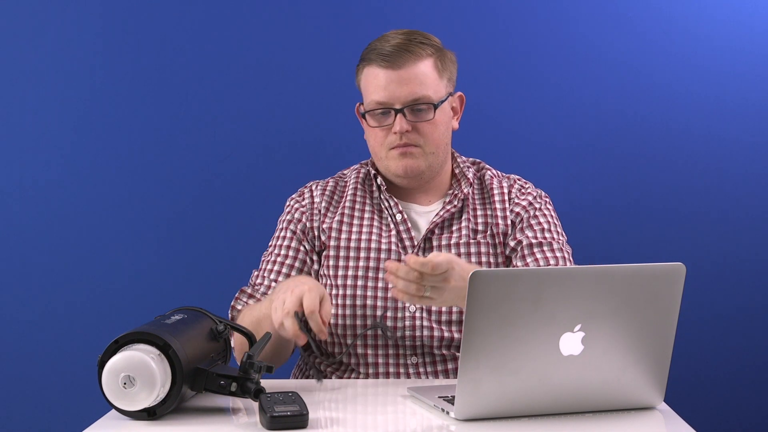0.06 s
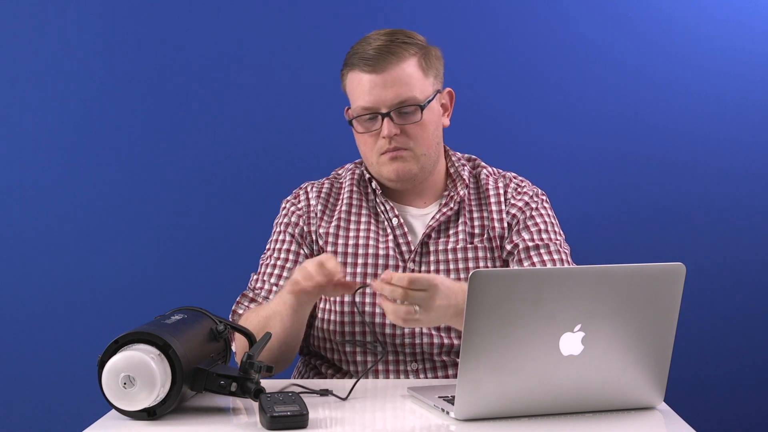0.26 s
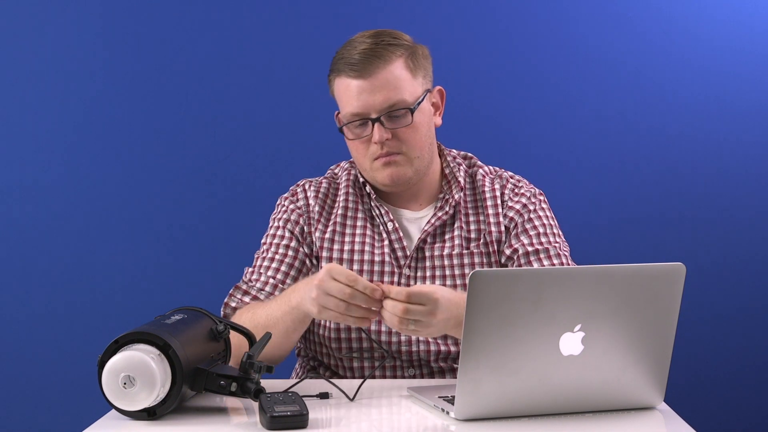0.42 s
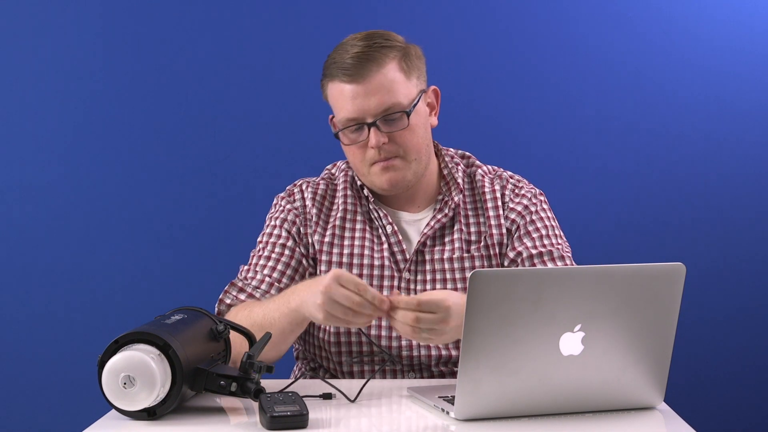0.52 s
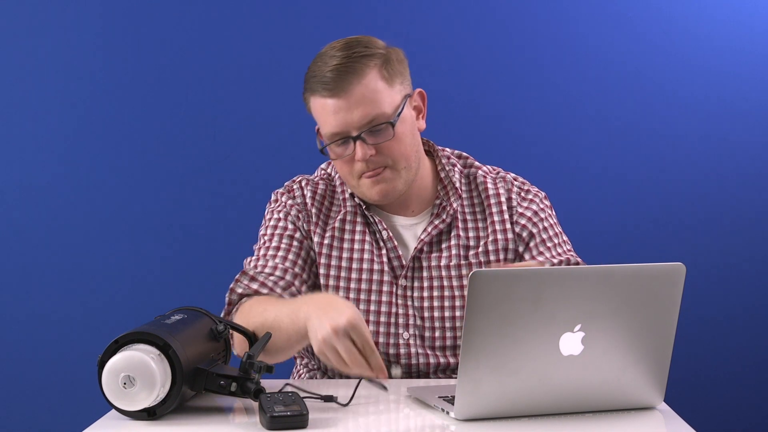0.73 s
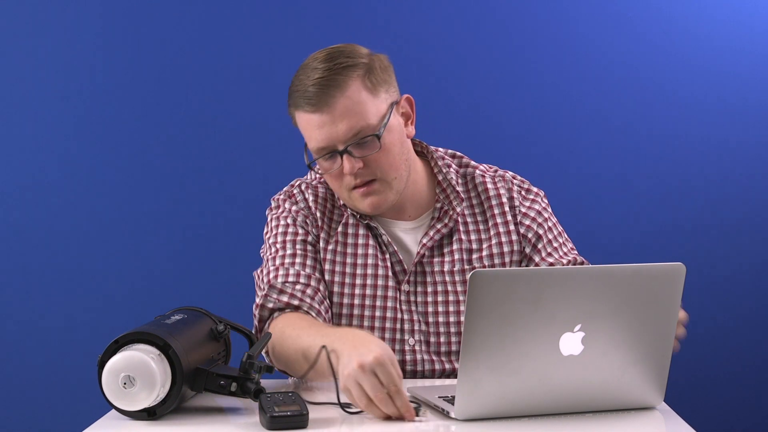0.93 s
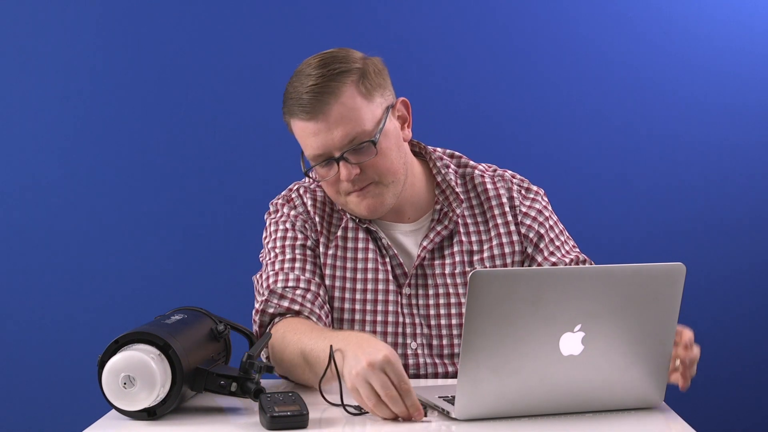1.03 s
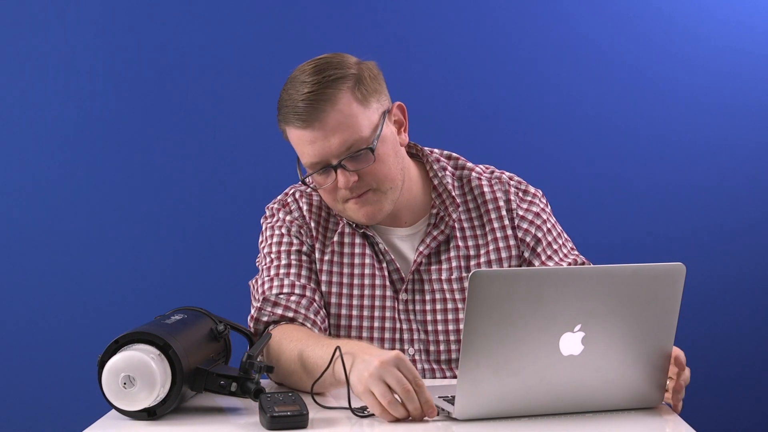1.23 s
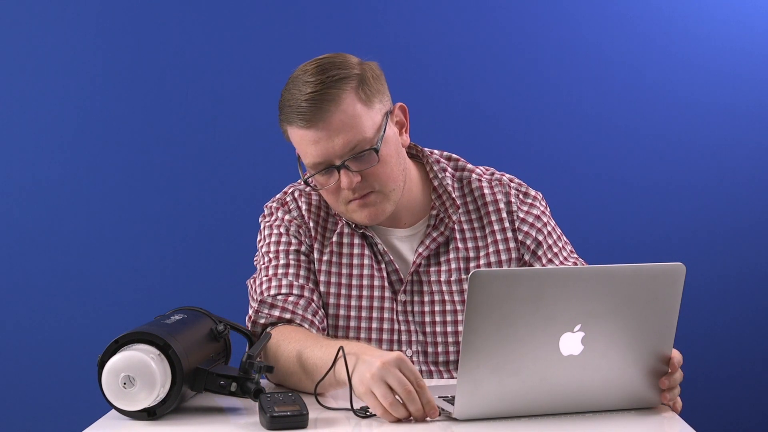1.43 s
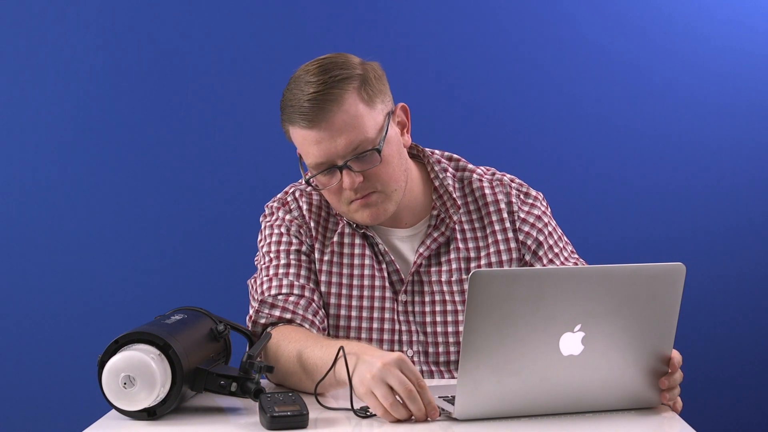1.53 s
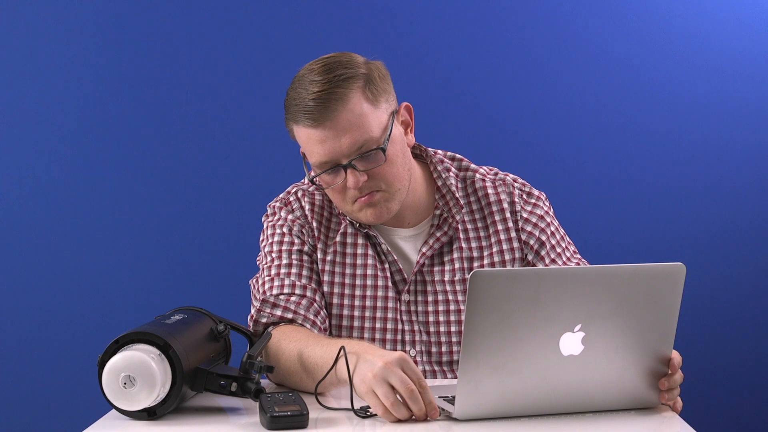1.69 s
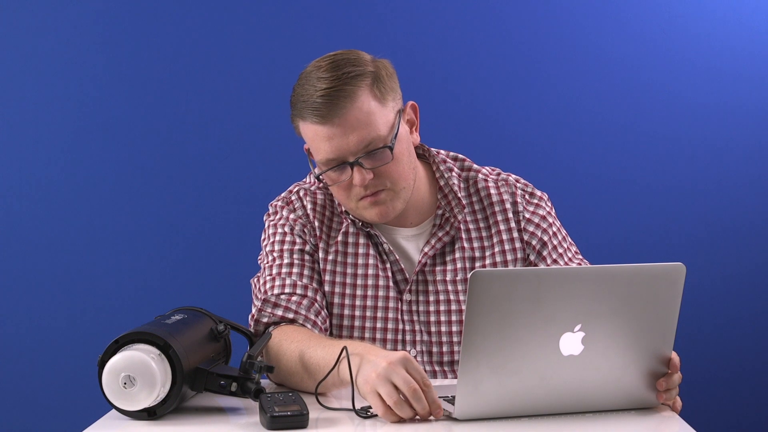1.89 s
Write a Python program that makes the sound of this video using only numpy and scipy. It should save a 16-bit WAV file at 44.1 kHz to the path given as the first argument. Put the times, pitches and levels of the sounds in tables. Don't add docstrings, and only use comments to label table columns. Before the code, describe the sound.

A small metal-tipped cable plug hits a hard desk with a sharp clack and quick bounces, then two lighter taps, faint touches and a tiny springy click at a laptop port, close in a small dry room.

```python
import sys
import numpy as np
from scipy import signal
from scipy.fft import rfft, irfft
from scipy.io import wavfile
from scipy.ndimage import uniform_filter1d, map_coordinates

SR = 44100
rng = np.random.default_rng(int(sys.argv[2]) if len(sys.argv) > 2 else 0)


def transcribe(u):
    v = np.clip(np.atleast_2d(u).T, -1, 1)
    q = np.round(v * 32767).astype(np.int16)
    wavfile.write(sys.argv[1], SR, q)


def undo_db(level):
    steps = np.asarray(level, float) / 20
    return 10 ** steps


N = 85995
T = np.arange(N) / SR

# pitch_hz, level_db (per Hz)
HUM = [(15, -18), (25, -9.5), (157, -0.5), (503, -13), (695, -9.5), (863, -18.5), (2610, -24.5),
       (16000, -52.5)]
# time_s, level_db
RUBBING = [(0, -66.5), (0.199, -65.5), (.55, -65.5), (0.702, -66.5), (0.801, -65.5), (0.871, -58),
           (1.08, -67.5), (1.2, -68), (1.45, -71.5), (1.7, -93.5), (1.95, -93)]
# start_s, peak_db, shell_pitch_hz, overtone_tilt_db (per octave), metal_edge_db (against peak)
CONTACTS = [(0.2363, -11.5, 3060, 1, -32.5), (0.2767, 2, 4650, 1, -18), (.3323, -2, 3790, -0.5, -36.5),
            (.3371, -10.5, 3150, -5, -18), (.3525, -13.5, 4530, -4.5, -42.5),
            (.4095, -16.5, 2630, -1.5, -29.5), (0.7368, -34.5, 1600, -6, -25), (.8832, -13, 3900, 1, -22.5),
            (0.966, -35, 4260, 0, -28.5), (0.9701, -9, 5290, -1, -17.5), (1.187, -35.5, 1340, -2, -48),
            (1.3604, -28.5, 2910, -1, -15), (1.3722, -36, 3000, -4, -11.5), (1.5567, -45, 3107, 3.5, -3.5),
            (1.8211, -26, 2160, 12, -14.5), (1.8221, -28, 2520, 5.5, -8)]
# multiple (of shell pitch), level_db, fade_s (to fall 60 dB)
SHELL_OVERTONES = [(.3, -6.5, 0.0019), (.42, 0.5, 0.0017), (.58, -1, 0.0024), (.78, 3, 0.0015),
                   (1, -1, 0.0017), (1.27, -2.5, 0.0021), (1.6, -5, 0.001), (2.0, -16.5, 0.0009)]
# start_s, peak_db, pitch_hz
SLEEVE_RINGS = [
    (.2356, -11, 3920),
    (.2772, -3.5, 4625),
    (.3326, -13.5, 4270),
    (.3374, -9.5, 3700),
    (.8848, -24, 5930),
    (.9719, -13.5, 5300),
    (1.3601, -44.5, 2990),
]
# start_s, peak_db, pitch_hz, fade_s (to fall 60 dB)
THUDS = [(.2365, -39, 706, .02), (.2775, -12.5, 674, 0.029), (.279, -34.5, 323, 0.084),
         (.3375, -11.5, 604, 0.018), (.345, -20, 344, 0.028), (.28, -33.5, 195, .08),
         (.36, -41.5, 196, 0.058), (.41, -41, 570, 0.015), (.865, -30.5, 296, 0.013),
         (.884, -31.5, 650, 0.019), (.968, -29, 650, 0.033), (.972, -38.5, 187, 0.083),
         (.975, -30.5, 374, 0.019), (1.058, -39, 228, 0.047), (1.188, -42.5, 670, 0.046),
         (1.59, -43, 677, 0.047)]
# start_s, peak_db, pitch_hz
LATCH_TWITCHES = [
    (1.8212, -23, 3560),
    (1.8325, -40, 3470),
    (1.859, -54, 3450),
    (1.922, -53.5, 3750),
    (1.9405, -39.5, 3900),
]
# delay_s, level_db
NEAR_ECHOES = [(.0006, -10), (.0011, -14.5), (.0020, -6), (.0023, -2.5), (.0027, -11), (.0034, -11),
               (.0046, -17.5), (.0098, -23)]
# pitch_hz, level_db, fade_s (to fall 60 dB)
ROOM_TAIL = [(200, -5.5, 0.65), (570, -1, 0.28), (1354, 3.5, 0.19), (3700, -0.5, 0.22), (6500, -4.5, .22),
             (10000, -4.5, 0.22), (14000, -7, .19)]


def read(table, hz, col=1):
    a = np.array(table, float)
    return np.interp(np.log(hz), np.log(a[:, 0]), a[:, col])


def band(x, hz, width_hz):
    low = max(hz - width_hz / 2, 10)
    high = min(hz + width_hz / 2, SR * 0.45)
    return signal.sosfilt(signal.butter(2, [low, high], "bandpass", fs=SR, output="sos"), x)


def ring(t, hz, fade_s):
    t = np.maximum(t, 0)
    return np.sin(2 * np.pi * hz * t) * np.exp(-np.log(1000) * t / fade_s)


def soft_start(t, rise_s):
    return 1 - np.exp(-np.maximum(t, 0) / rise_s)


def walk(rate_hz):
    k = int(SR / rate_hz)
    steps = np.repeat(rng.standard_normal(N // k + 1), k)
    drift = uniform_filter1d(uniform_filter1d(steps, k), k)[:N]
    return drift / drift.std()


def air():
    hum_db, flicker_db, hiss_db, hiss_hz = -50.5, 0.4, -64.5, 10900
    f = np.fft.rfftfreq(N, 1 / SR) + 1
    hum = irfft(rfft(rng.standard_normal(N)) * undo_db(read(HUM, f)), N)
    hum = hum / hum.std() * undo_db(hum_db + flicker_db * walk(5.8))
    hiss = undo_db(hiss_db) * band(rng.standard_normal(N), hiss_hz * 1.4, hiss_hz)
    return hum + hiss


def rub():
    grains = rng.standard_normal(N) * (rng.random(N) < 0.2)
    x = band(grains, 3800, 6300)
    time_s, level_db = np.array(RUBBING, float).T
    return x / x.std() * undo_db(np.interp(T, time_s, level_db) + 2.1 * walk(15))


def sleeve():
    return sum(undo_db(db) * ring(T - s, hz, 0.01) * soft_start(T - s, 0.0001) for s, db, hz in SLEEVE_RINGS)


def taps():
    contact_s, longest_fade_s, scatter_db = 0.00012, 0.0018, 1
    edge_hz, edge_width_hz, edge_boost_db, edge_fade_s = 11500, 15000, 7.5, 0.004
    out, n = np.zeros(N + SR), SR // 20
    for start_s, peak_db, pitch_hz, tilt_db, edge_db in CONTACTS:
        i = int(start_s * SR)
        t = np.maximum((np.arange(n) + i) / SR - start_s, 0)
        shell = np.zeros(n)
        for k, (multiple, level_db, fade_s) in enumerate(SHELL_OVERTONES):
            db = level_db + scatter_db * rng.standard_normal() + tilt_db * np.log2(multiple)
            shell += (-1) ** k * undo_db(db) * ring(t, pitch_hz * multiple, min(fade_s, longest_fade_s))
        shell *= 1 - np.exp(-(t / contact_s) ** 2)
        edge = band(rng.standard_normal(n) * undo_db(-60 * t / edge_fade_s), edge_hz, edge_width_hz)
        tick = shell / np.abs(shell).max()
        tick += undo_db(edge_db + edge_boost_db) * edge / np.abs(edge).max()
        out[i:i + n] += undo_db(peak_db) * tick
    return signal.sosfilt(signal.butter(2, 750, "highpass", fs=SR, output="sos"), out[:N])


def bumps():
    return sum(undo_db(db) * ring(T - s, hz, fade_s) * soft_start(T - s, 0.0019) for s, db, hz, fade_s in THUDS)


def sway():
    start_s, level_db, pitch_hz, length_s = 0.866, -48.5, 43, 0.027
    return undo_db(level_db) * np.sin(2 * np.pi * pitch_hz * T) * np.exp(-((T - start_s) / length_s) ** 2)


def latch():
    return sum(undo_db(db) * ring(T - s, hz, 0.0062) * soft_start(T - s, 0.00034) for s, db, hz in LATCH_TWITCHES)


def room(broad, beam):
    t = T[:SR // 2]
    tail = np.zeros(len(t))
    for hz in 120 * 2 ** np.arange(0, 7.1, 0.25):
        noise = band(rng.standard_normal(len(t)), hz, hz * 0.35)
        tail += noise * undo_db(read(ROOM_TAIL, hz) - 60 * t / read(ROOM_TAIL, hz, col=2))
    tail *= (1 - np.exp(-(t / 0.0037) ** 2)) * undo_db(-26.5)
    direct = broad + beam
    dull = signal.sosfilt(signal.butter(2, 12700, fs=SR, output="sos"), direct)
    echoes = sum(undo_db(db) * map_coordinates(dull, [(T - s) * SR], mode="nearest") for s, db in NEAR_ECHOES)
    return direct + echoes + signal.fftconvolve(broad, tail)[:N]


def scene():
    thuds = bumps()
    broad = taps() + rub() + thuds + latch()
    beam = sleeve() + undo_db(-6) * thuds
    return (room(broad, beam) + sway() + air())[None, :]


def band_limit(x):
    return signal.sosfilt(signal.butter(12, 16300, fs=SR, output="sos"), x)


def record(dry):
    cut = signal.sosfilt(signal.butter(6, 15900, fs=SR, output="sos"), dry)
    mix = np.clip(cut, -1, 1)
    return band_limit(mix)


dry = scene()
out = record(dry)
transcribe(out)
```